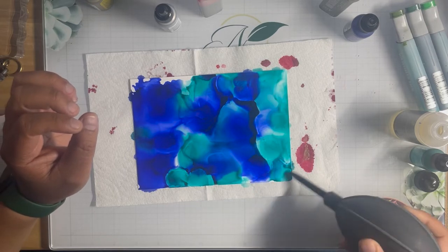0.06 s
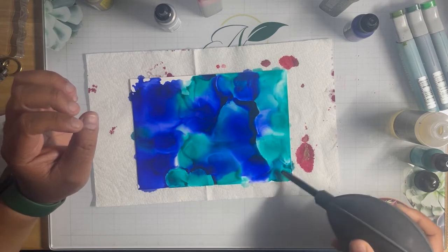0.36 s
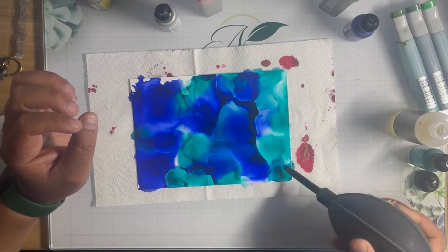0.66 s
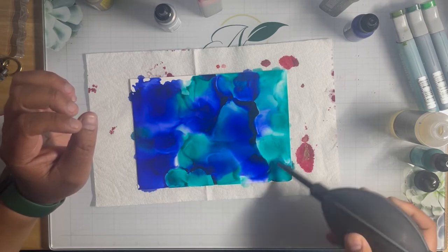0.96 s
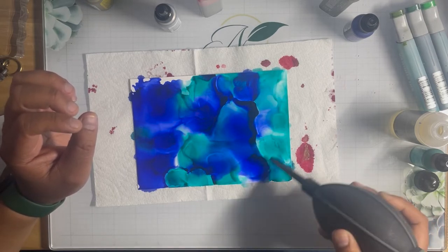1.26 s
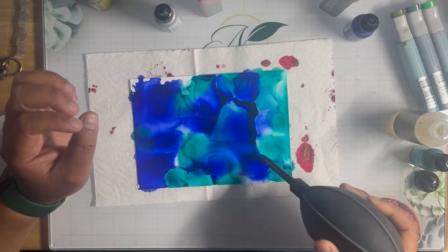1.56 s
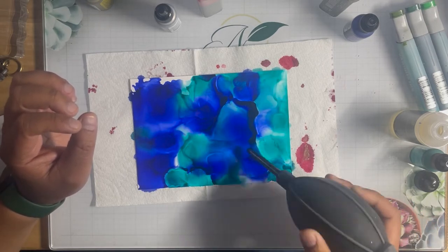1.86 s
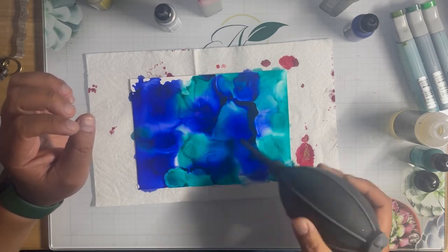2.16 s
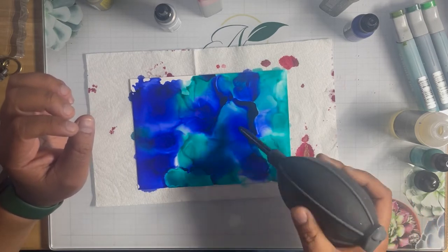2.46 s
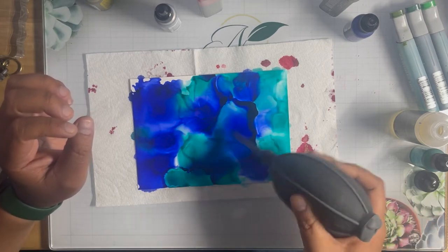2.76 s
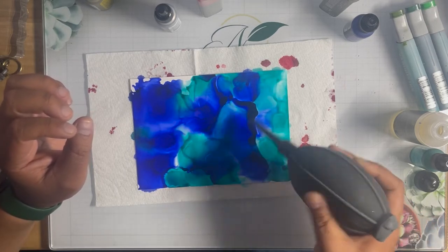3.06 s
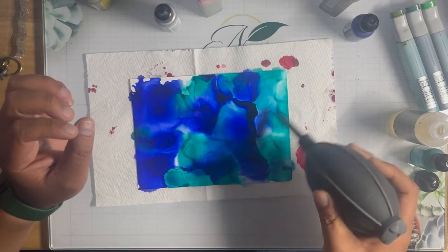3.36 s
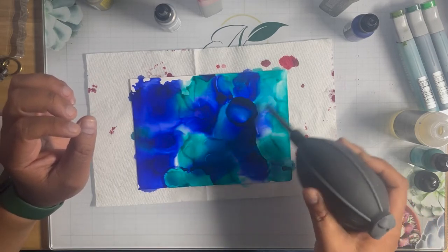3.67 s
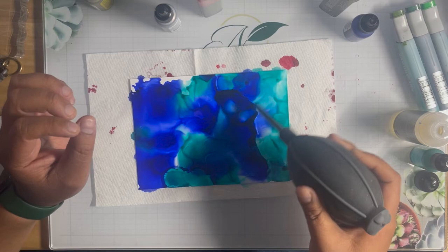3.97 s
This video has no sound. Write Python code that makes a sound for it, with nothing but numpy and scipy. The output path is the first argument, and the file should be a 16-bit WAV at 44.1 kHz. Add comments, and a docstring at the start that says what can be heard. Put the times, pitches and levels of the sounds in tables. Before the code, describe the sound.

Close, rhythmic puffs of air come from a squeezed rubber blower in a small, humming room. It starts with sharp rasps across the edge of paper, then settles into even hisses, the bulb faintly sucking air back after each.

```python
"""A small room with a low machine hum, a close pair of microphone ports at the table.
A rubber bulb blower is squeezed about three times a second over wet ink on paper. Each squeeze sends a
hiss from the nozzle; on each release the bulb sucks air back through its valve with a faint hollow ring.
The first jets catch the edge of the paper and rasp much louder. Table, bottles and walls reflect it."""
import sys
import numpy as np
from scipy import signal
from scipy.fft import rfft, irfft
from scipy.io import wavfile
from scipy.ndimage import map_coordinates

SR = 44100
rng = np.random.default_rng(int(sys.argv[2]) if len(sys.argv) > 2 else 0)


def wav_out(sig):
    """Save sig, one row per channel (or a flat mono array), as 16-bit PCM at SR to the path in sys.argv[1]."""
    wavfile.write(sys.argv[1], SR, np.round(np.clip(np.atleast_2d(sig).T, -1, 1) * 32767).astype(np.int16))


N = 176400
T, HZ = np.arange(N) / SR, np.fft.rfftfreq(N, 1 / SR)

def amp(db):
    return 10 ** (np.asarray(db) / 20)

def curve(points):
    """A table's value at every frequency, interpolated on a log axis."""
    f, value = np.transpose(points)
    return np.interp(np.log(HZ + 1), np.log(f + 1), value)

def resonances(modes):
    """Gain of a set of steep-sided resonances."""
    return np.sqrt(sum((amp(db) / (1 + ((HZ - hz) / width) ** 2)) ** 2 for hz, width, db in modes))

def wobble(rate_hz):
    """Random motion of unit size, up to the given rate."""
    x = irfft(rfft(rng.standard_normal(N)) / (1 + (HZ / rate_hz) ** 4), N)
    return x / x.std()

def arch(start, length, sharp, skew=1):
    """Air flow that swells and dies in one stroke of the hand."""
    progress = np.clip((T - start) / length, 0, 1)
    return abs(np.sin(np.pi * progress ** skew)) ** sharp

# Likeness of the sound at the two microphone ports: f/Hz, coherence/0-1
PORT_COHERENCE = [(100, 1), (220, 0.84), (450, 0.28), (800, 0.12), (1050, 0.38), (1400, 1), (2300, 1),
                  (5300, 0.85), (10000, 1), (15000, 1)]
# Lead of the left port over the right: f/Hz, phase/rad
PORT_LEAD = [(2200, 0), (5500, -.8), (6800, -.3), (7900, -.8), (8800, 0), (9400, 1.7), (10300, 3.14),
             (11800, 6.28), (12400, 6.4), (14600, 12.57)]
def noise(gain):
    """Turbulence of the given spectrum as the two ports hear it."""
    right, unrelated = rfft(rng.standard_normal((2, N)))
    same = np.clip(curve(PORT_COHERENCE), 0, 1)
    left = (same * right + np.sqrt(1 - same ** 2) * unrelated) * np.exp(1j * curve(PORT_LEAD))
    return irfft(np.array([left, right]) * gain, N) * np.sqrt(SR / 2)

def strokes(gain, rows, sharp, skew):
    """Air noise under a row of strokes, each tilting five octave bands about 5 kHz."""
    octaves = np.arange(-2, 3)
    place = np.clip(np.log2((HZ + 1) / 5000), -2, 2)
    air, levels = rfft(noise(gain)), np.zeros((len(octaves), N))
    for start, length, db, tilt, *_ in rows:
        levels += amp(db + tilt * octaves)[:, None] * arch(start, length, sharp, skew)
    bands = [irfft(air * np.maximum(1 - abs(place - k), 0), N) for k in octaves]
    return sum(band * level for band, level in zip(bands, levels))

# Room tone, low end: f/Hz, level/dB per Hz
ROOM_RUMBLE = [(30, -95), (50, -78), (66, -71.5), (78, -78.5), (89, -66), (99, -80), (109, -64.5),
               (119, -62), (132, -71.5), (145, -84), (157, -72), (190, -75.5), (220, -83.5), (320, -93),
               (380, -89.5), (550, -94)]
# Room tone, faint hiss: f/Hz, level/dB per Hz
ROOM_HISS = [(800, -102), (1250, -110), (1850, -117), (2350, -115), (3400, -125), (7600, -131),
             (9600, -117), (10700, -124), (12000, -138), (16000, -150)]
# Thin whine in the background: f/Hz, half-width/Hz, level/dB per Hz
ROOM_WHINE = [(8990, 116, -107)]
def room_tone(hum_hz=59.33, hum_db=-49.5, waver=0.08):
    """Wavering machine hum, rumble in the room's low modes, faint hiss and a thin whine."""
    phase = 2 * np.pi * hum_hz * T + waver * wobble(rate_hz=7.6)
    hum = np.sqrt(2) * amp(hum_db) * np.sin(phase) * (1 + waver * wobble(rate_hz=4.5))
    return hum + noise(np.hypot(amp(curve(ROOM_RUMBLE + ROOM_HISS)), resonances(ROOM_WHINE)))

def reflections(x, table_db=-13.5, spread_s=0.012, walls_db=-28.5, t60_s=0.57, dull_hz=4000):
    """Quick bounces off the table and bottles nearby, then the short, dull tail of the walls."""
    t = T[:SR // 2]
    near = np.zeros(len(t))
    near[(rng.uniform(0.1, 1, size=8) * spread_s * SR).astype(int)] = rng.choice([-1, 1], size=8)
    tail = rng.standard_normal((2, len(t))) * amp(-60 * t / t60_s)
    tail = signal.lfilter(*signal.butter(1, dull_hz, fs=SR), tail)
    paths = amp(table_db) * near / np.linalg.norm(near) + amp(walls_db) * tail / np.linalg.norm(tail[0])
    return signal.fftconvolve(x, paths, axes=1)[:, :N]

def paper_tap(start_s=1.045, hz=1096, db=-59.5, decay_s=0.017):
    """The paper lifts with a soft tap: one quickly damped note."""
    age = np.maximum(T - start_s, 0)
    return amp(db) * np.sin(2 * np.pi * hz * age) * np.exp(-age / decay_s)

def blower_tick(start_s=1.1786, gain_db=8.3, decay_s=0.0029):
    """One short, bright snap from the blower, coloured like its jet."""
    envelope = (T >= start_s) * np.exp(-abs(T - start_s) / decay_s)
    return noise(amp(curve(JET_HISS) + gain_db)) * envelope

# Air through the valve: f/Hz, level/dB per Hz
VALVE_HISS = [(1500, -122), (3500, -120), (5500, -114), (7800, -114), (9500, -106), (10500, -103),
              (11800, -122), (15500, -131)]
# Resonances of the valve: f/Hz, half-width/Hz, level/dB per Hz
VALVE_PEAKS = [(4150, 215, -107), (6350, 150, -105.5), (6890, 120, -105), (8400, 330, -102),
               (10470, 200, -93)]
# Hollow ring of the bulb: f/Hz, half-width/Hz, level/dB per Hz
BULB_PEAKS = [(1220, 170, -103), (2024, 78, -98.5), (2276, 94, -102), (2530, 240, -103)]
# Thin whistle of the valve: f/Hz, half-width/Hz, level/dB per Hz
WHISTLE_PEAKS = [(4280, 45, -100), (6210, 71, -97), (6950, 56, -100)]
# Refills of the bulb: t/s, length/s, hiss gain/dB, tilt/dB per octave, ring gain/dB, whistle gain/dB
INTAKES = [(0.191, 0.15, 2, -6, -3.5, -11), (0.491, 0.17, 0, -5, -1, -21), (0.769, 0.24, 3, -7.5, 1.5, -15),
           (1.126, 0.16, 5, -5.5, -1, -4), (1.407, 0.15, -2.5, -1, -5, -1), (1.713, 0.13, 1.5, 0, -6.5, -5),
           (2.016, 0.16, 5.5, -1.5, 0, 0), (2.309, 0.16, 4, -4.5, -0.5, -0.5),
           (2.59, 0.14, 3, -2.5, -7, 3.5), (2.863, 0.14, 4.5, -0.5, -6, 6.5),
           (3.176, 0.17, 3.5, 2, 1.5, 0.5), (3.475, 0.164, 3.5, -3, 4, 0), (3.774, 0.15, -1, 0, -2.5, 1.5)]
def valve(roughness=0.047):
    """The bulb springs back and draws air through the ringing valve, which whistles at full flow."""
    spectrum = np.hypot(amp(curve(VALVE_HISS)), resonances(VALVE_PEAKS))
    hiss = strokes(spectrum, INTAKES, sharp=2.6, skew=0.92)
    suction, ring, whistle = np.zeros((3, N))
    for start, length, _, _, ring_db, whistle_db in INTAKES:
        draw = arch(start, length, sharp=0.55)
        suction += draw
        ring += amp(ring_db) * draw
        whistle += amp(whistle_db) * arch(start, length, sharp=3.2, skew=1.08)
    air = hiss + ring * noise(resonances(BULB_PEAKS)) + whistle * noise(resonances(WHISTLE_PEAKS))
    return pitch_bend(air * np.exp(roughness * wobble(rate_hz=120)), suction)

def pitch_bend(x, suction, depth=0.011):
    """The valve's pitch bends up with the suction and wanders slightly."""
    bend = depth * (suction + wobble(rate_hz=2) / 2)
    position = np.arange(N) + np.cumsum(bend - bend.mean())
    return np.array([map_coordinates(channel, [position], order=5, mode="reflect") for channel in x])

def jet_flow():
    """Strength of the air stream on the paper."""
    return sum(arch(start, length, sharp=1) for start, length, *_ in SQUEEZES)

# Resonances of the gap under the sheet: f/Hz, half-width/Hz, level/dB per Hz
GAP_PEAKS = [(1500, 190, -94), (2216, 310, -76)]
def hollow_rush(lag_s=0.028, width_s=0.029, roughness=0.075):
    """Air slips under the sheet just after each catch of its edge and splutters in the gap."""
    level = sum(amp(db) * np.exp(-((T - catch - lag_s) / width_s) ** 2) for catch, *_, db in CATCHES)
    return noise(resonances(GAP_PEAKS)) * level * jet_flow() * np.exp(roughness * wobble(rate_hz=160))

# Jet across the paper's edge: t/s, hold/s, rise/dB per s, fall/dB per s, rasp gain/dB, rush gain/dB
CATCHES = [(0.11, 0.015, 495, 427, 4.5, 2), (0.411, 0.009, 559, 443, 7.5, 3),
           (0.759, 0.019, 241, 450, -7, -8.5), (1.062, 0.014, 200, 500, -18, -18)]
# Broad rasp at the edge: f/Hz, level/dB per Hz
RASP = [(700, -113), (1450, -101), (2250, -92), (3400, -84), (5600, -83), (7500, -82.5), (10500, -76.5),
        (12500, -95.5), (15500, -107)]
# Peaks in the rasp: f/Hz, half-width/Hz, level/dB per Hz
RASP_PEAKS = [(2280, 130, -78), (2807, 92, -75), (3920, 114, -74), (4630, 290, -81), (6660, 280, -82.5),
              (8200, 220, -78.5)]
def paper_edge(jump_db=6, jump_s=0.0023, roughness=0.065):
    """The jet nears the paper's edge, catches it with a jump, rasps with a fast flutter and slides off."""
    level = np.zeros(N)
    for catch, hold, rise, fall, db, _ in CATCHES:
        nearing_db = rise * np.maximum(catch - T, 0) + jump_db * np.clip((catch - T) / jump_s, 0, 1)
        leaving_db = fall * np.maximum(T - catch - hold, 0)
        level += amp(db - nearing_db - leaving_db)
    rasp = noise(np.hypot(amp(curve(RASP)), resonances(RASP_PEAKS)))
    return rasp * level * jet_flow() * np.exp(roughness * wobble(rate_hz=980))

# Nozzle hiss at the microphone: f/Hz, level/dB per Hz
JET_HISS = [(400, -112), (1200, -103), (2500, -99), (3200, -101), (7000, -98), (9000, -93), (10500, -84.5),
            (11500, -97), (13000, -113), (15500, -119)]
# Squeezes of the bulb: t/s, length/s, gain/dB, tilt/dB per octave
SQUEEZES = [(0.008, 0.25, -12.5, -8.5), (0.364, 0.19, -24.5, -13.5), (0.67, 0.17, -2, -3.5),
            (0.976, 0.16, -2, -1), (1.281, 0.14, -3.5, -2), (1.577, 0.12, -3, -0.5), (1.878, 0.14, -1, 0),
            (2.171, 0.15, -2, -1.5), (2.466, 0.13, -2.5, 1), (2.732, 0.13, -1, 0.5), (3.039, 0.14, 1, 0.5),
            (3.341, 0.14, 0.5, -1.5), (3.642, 0.13, 1, -1.5), (3.952, 0.12, 1, -1.5)]
def nozzle(roughness=0.1):
    """Each squeeze drives a turbulent jet out of the nozzle."""
    jet = strokes(amp(curve(JET_HISS)), SQUEEZES, sharp=1.65, skew=0.8)
    return jet * np.exp(roughness * wobble(rate_hz=200))

def scene():
    """Blower and paper with their reflections, over the room tone."""
    direct = nozzle() + paper_edge() + hollow_rush() + valve() + blower_tick() + paper_tap()
    return direct + reflections(direct) + room_tone()

def record(dry, left_db=-0.5, cutoff_hz=15800):
    """The microphone pair leans slightly to the right and cuts the highest treble."""
    lowpass = signal.firwin(511, cutoff_hz, window=("kaiser", 9), fs=SR)
    return signal.oaconvolve(dry * amp([[left_db], [0]]), lowpass[None], "same")

dry = scene()
out = record(dry)
wav_out(out)
```